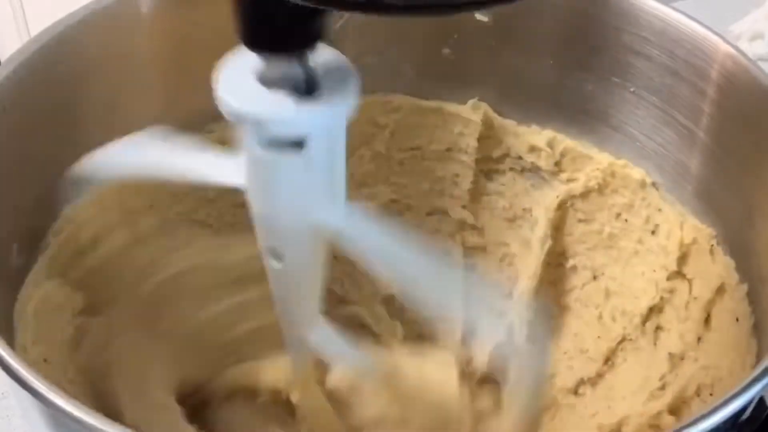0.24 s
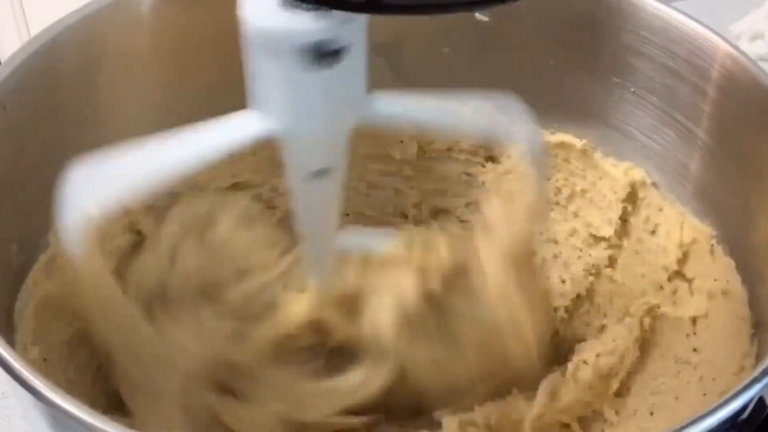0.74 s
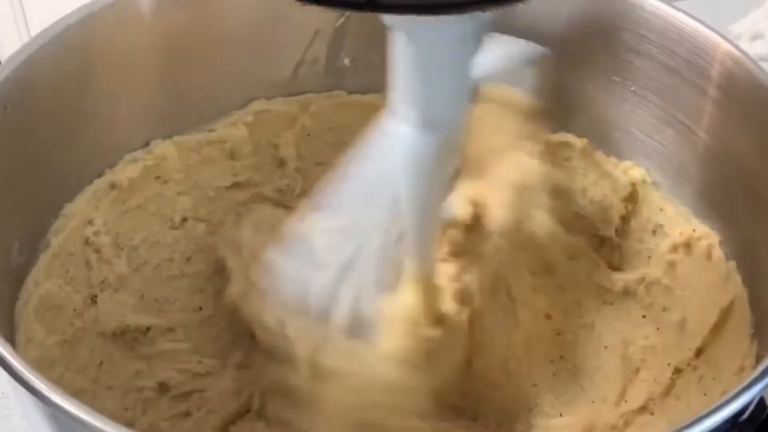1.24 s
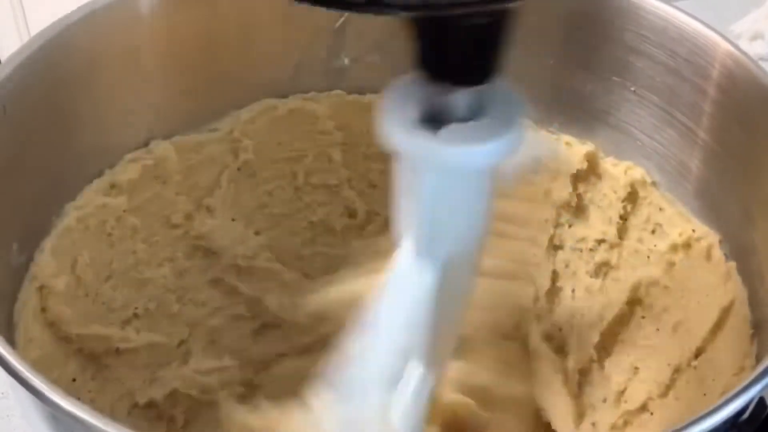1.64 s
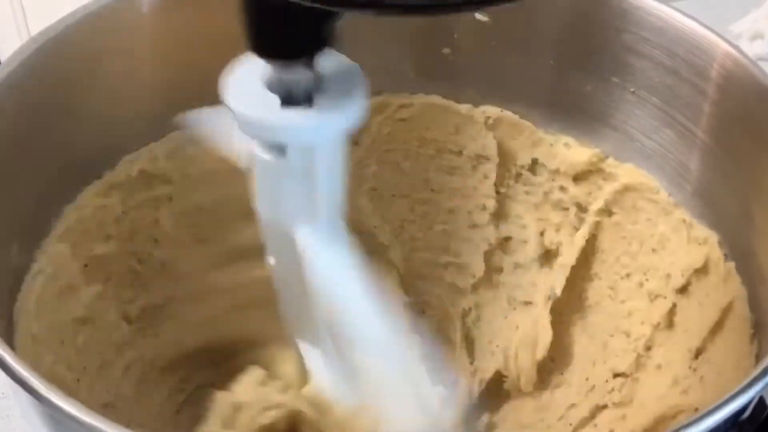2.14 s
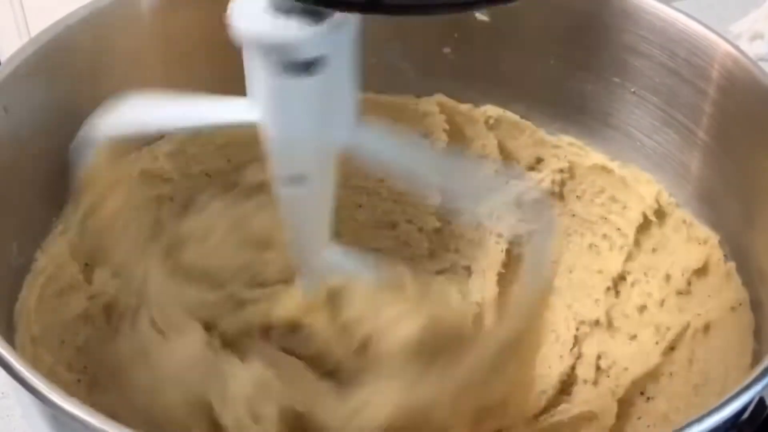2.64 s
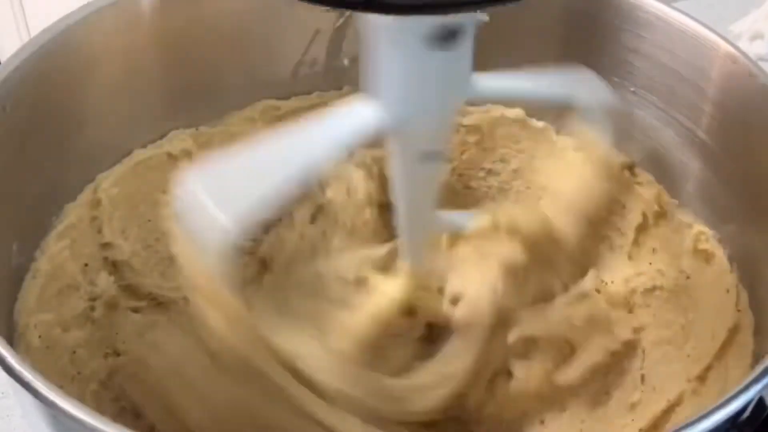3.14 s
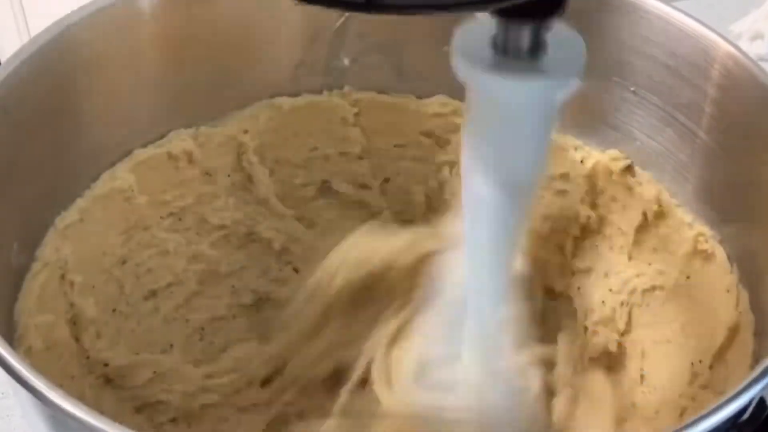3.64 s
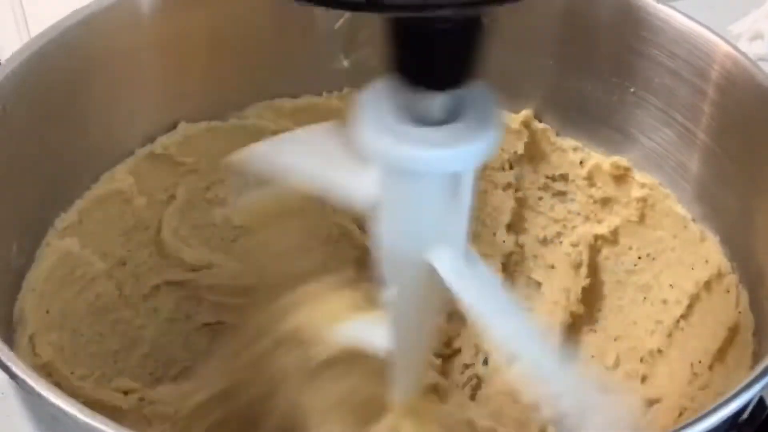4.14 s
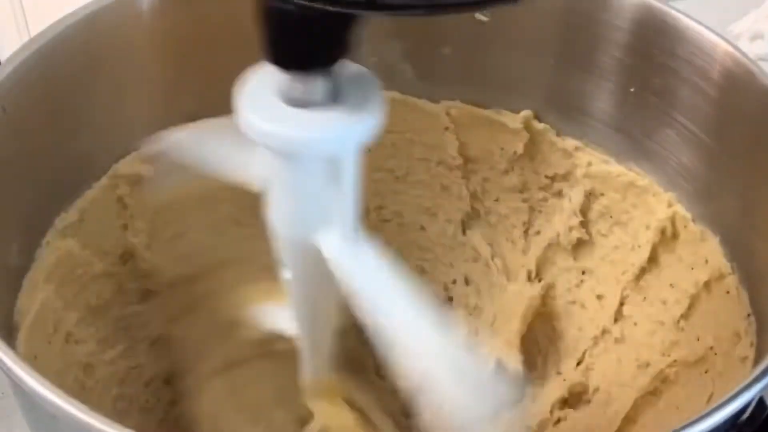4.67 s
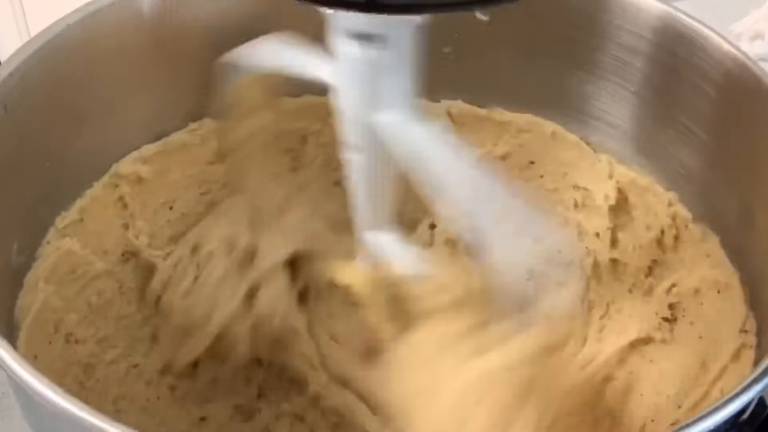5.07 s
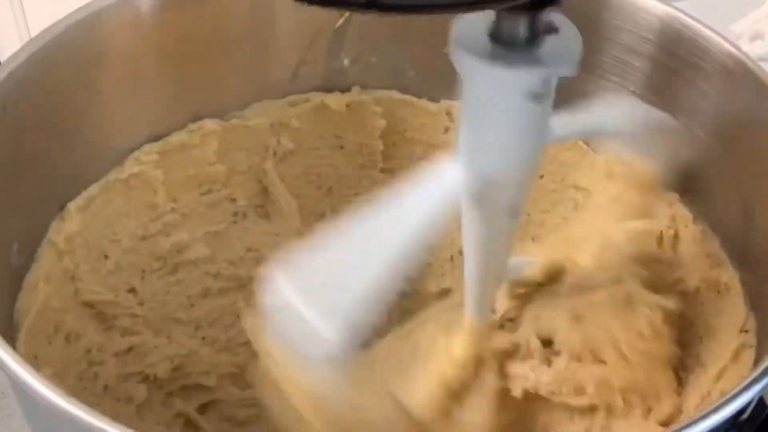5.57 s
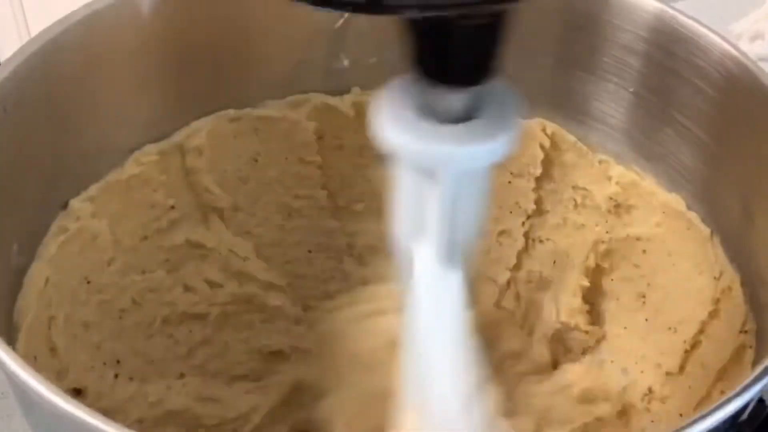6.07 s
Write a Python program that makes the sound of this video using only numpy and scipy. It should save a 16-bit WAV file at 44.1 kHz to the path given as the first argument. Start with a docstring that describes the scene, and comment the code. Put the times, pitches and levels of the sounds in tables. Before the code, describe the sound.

From 0 to about 6.3 seconds a stand mixer works thick dough, already at full steady speed and cut off still running. Very close, dry stereo pickup. The main sound is a strong nasal gear whine around 920 Hz with weaker overtones, its pitch wavering slightly and its loudness throbbing about 10 to 15 times a second, with tiny dropouts giving a gritty warble. Beneath lie rough gear rattle, faint low mains hum and shaft drone; above, thin commutator whistle and broad airy hiss. Short hollow housing knocks fall irregularly, clearer near 0.1, 0.5, 0.7, 1.3 and 1.8 seconds, then at 3.2 and 3.8, strongest around 3.9, 4.4 and 5.0. Quiet, low dough thuds accompany some of them, barely rising from the motor. The whine swells and thins slightly, without any real change of speed.

```python
"""A wavering gear whine leads, close up at two microphone ports: a stand mixer kneading thick dough.
Three mesh sines throb with the gear turns; further sines give shaft, commutator whistle and mains hum.
Noise in resonant bands makes gear rattle and broad gear and commutator overtones, over a broad hiss.
Gear knocks and dough thuds ring damped modes of the housing and bowl."""
import sys
import numpy as np
from scipy import signal
from scipy.fft import rfft, irfft, next_fast_len
from scipy.io import wavfile

SR = 44100
rng = np.random.default_rng(int(sys.argv[2]) if len(sys.argv) > 2 else 0)


def put_to_file(sound):
    """Save the sound as 16-bit audio at rate SR, in the file named by the first command-line argument."""
    columns = np.atleast_2d(sound).T  # one column per channel
    safe = np.clip(columns, -1, 1)
    whole_steps = np.round(safe * 32767)
    wavfile.write(sys.argv[1], SR, whole_steps.astype(np.int16))


N = 277995
TIME = np.arange(N) / SR

# Pitch and level curves of the whine, before the faster swings; partial 3 flickers by chance:
# time_s, pitch_hz, then right-port level_db of partials 1, 2 and 3
WHINE_CURVES = [(0.0, 923, -25, -46.0, -37.0), (0.03, 924, -18.5, -26, -39), (0.06, 921.6, -31, -29.0, -36),
                (0.09, 915, -22, -31.5, -37), (0.12, 918.7, -20.5, -27, -38), (0.15, 922, -26.5, -28, -33),
                (0.18, 909, -20.5, -35.0, -37), (0.21, 914, -21, -37.0, -34),
                (0.24, 910, -28.5, -37, -37.0), (0.27, 906, -19.5, -34, -38.0), (0.3, 907, -16, -34, -37.5),
                (0.33, 914.0, -23, -29, -39), (0.36, 914, -21.5, -33.5, -38),
                (0.39, 921, -17, -32.5, -37.5), (0.42, 934, -16, -32.5, -36), (0.45, 920, -16, -36, -37.5),
                (0.48, 921, -16.5, -29, -37), (0.51, 920.4, -23.5, -32, -37.5),
                (0.54, 923.3, -21.5, -38, -34), (0.57, 927.5, -23.5, -27, -41), (0.6, 928, -26, -34, -34),
                (0.63, 930.2, -23, -34, -36.5), (0.66, 928.6, -24.5, -26, -35.0),
                (0.69, 925.8, -25, -33, -36.5), (0.72, 924.8, -19, -25, -36), (0.75, 923, -20, -31, -40),
                (0.78, 924.0, -39, -37.0, -38.0), (0.81, 926, -22.5, -30, -36),
                (0.84, 931, -14, -32.0, -45), (0.87, 930.3, -18.5, -35.5, -38.5),
                (0.9, 929.8, -18.5, -34.0, -33), (0.93, 928, -15, -31, -37.5),
                (0.96, 927.1, -18.5, -25, -36.5), (0.99, 925, -17, -26, -40), (1.02, 915, -22, -35, -37.0),
                (1.05, 921, -18.5, -32, -34), (1.08, 927, -16.5, -33.5, -36.0),
                (1.11, 927, -19, -32.0, -34), (1.14, 926.5, -17.5, -30.0, -38.5),
                (1.17, 927.3, -23.5, -33.0, -36), (1.2, 925.5, -24.5, -35.0, -38.5),
                (1.23, 922, -23, -35.5, -39), (1.26, 915, -29, -32, -37), (1.29, 912, -29, -29, -36.5),
                (1.32, 911, -27.0, -32.5, -31), (1.35, 920, -22.5, -34, -36), (1.38, 919, -22, -29, -35),
                (1.41, 917, -21, -36.0, -37.5), (1.44, 930, -19.5, -36.0, -37.5),
                (1.47, 924.6, -21, -37, -37), (1.5, 926, -18.5, -32.0, -32), (1.53, 932, -19.5, -30, -40.0),
                (1.56, 933, -19.5, -39, -42), (1.59, 924, -13.5, -30, -35),
                (1.62, 923, -15.5, -31.0, -36.0), (1.65, 915, -21, -32.5, -36),
                (1.68, 920.7, -17, -32, -37), (1.71, 922.5, -18, -35.0, -35.0),
                (1.74, 924, -22.5, -35.5, -35.0), (1.77, 915, -19, -33.5, -37.0),
                (1.8, 915.5, -17.5, -33.0, -39.0), (1.83, 912, -31, -34.0, -39.5),
                (1.86, 911.7, -24.5, -39, -37), (1.89, 913.4, -26, -37, -33),
                (1.92, 921.5, -20, -27.5, -36), (1.95, 919.1, -28, -30, -39),
                (1.98, 927, -26.0, -32.0, -38.0), (2.01, 931, -23, -30, -40.0),
                (2.04, 937, -16.5, -29, -37), (2.07, 933.7, -15, -31, -37), (2.1, 932, -17.5, -33.5, -36),
                (2.13, 921.5, -17.5, -35.0, -35), (2.16, 918, -18, -34.5, -32),
                (2.19, 912, -15.5, -32, -40), (2.22, 925, -21.5, -35.5, -36), (2.25, 925, -19, -31, -39),
                (2.28, 930, -16, -28, -37), (2.31, 932, -16.5, -32.5, -38.0), (2.34, 925.5, -17, -41, -41),
                (2.37, 921, -16.5, -38.0, -37.5), (2.4, 922.3, -20, -39, -37.0),
                (2.43, 922.2, -18, -32.5, -35), (2.46, 921, -20, -33.0, -40), (2.49, 923, -26, -31.5, -35),
                (2.52, 925.7, -23.5, -32.5, -37), (2.55, 926, -29, -36, -34),
                (2.58, 928.5, -25.0, -33, -38.5), (2.61, 932, -23.0, -30, -34),
                (2.64, 930.5, -20, -28, -37.5), (2.67, 929, -19, -33.5, -36), (2.7, 925, -15, -34.0, -37),
                (2.73, 923, -23, -29, -33), (2.76, 923.5, -23, -36.0, -37.0), (2.79, 930, -20.0, -40, -40),
                (2.82, 929, -15.5, -32.0, -36), (2.85, 928.5, -17.5, -34, -37.5),
                (2.88, 923, -15.5, -27, -37.5), (2.91, 923, -14.5, -29, -38.0),
                (2.94, 930, -20.5, -33.0, -37.5), (2.97, 922.7, -14, -36, -36),
                (3.0, 922, -24, -36.5, -36.5), (3.03, 917.2, -17.5, -30, -36.0),
                (3.06, 917.2, -23.5, -34.5, -39), (3.09, 922, -20, -32, -43),
                (3.12, 916, -20.5, -33, -38.0), (3.15, 919, -27.0, -30, -31), (3.18, 919, -33, -33, -37),
                (3.21, 921.6, -25, -31.5, -36.0), (3.24, 923.5, -20, -28.0, -36.5),
                (3.27, 923, -21, -28.0, -36), (3.3, 920, -24, -33.5, -38), (3.33, 918.5, -25, -35.5, -36.5),
                (3.36, 919, -19.5, -35.0, -38), (3.39, 923, -21.5, -37.0, -38),
                (3.42, 930, -20.5, -34, -37), (3.45, 934, -16.5, -32, -37.5), (3.48, 927.1, -16, -25, -34),
                (3.51, 928, -19, -26, -34), (3.54, 921, -18.5, -31, -37), (3.57, 911, -16.5, -43, -39),
                (3.6, 920.5, -22.5, -40, -37.0), (3.63, 926, -18.5, -36, -34), (3.66, 924.7, -21, -36, -35),
                (3.69, 924.4, -23.5, -25, -36.0), (3.72, 923, -32, -32.5, -32),
                (3.75, 921.3, -26, -38, -40), (3.78, 918.1, -27.5, -35, -35),
                (3.81, 914.1, -22.5, -36, -37.0), (3.84, 911.2, -32, -34.0, -38.0),
                (3.87, 909, -27, -33.5, -33), (3.9, 914.5, -21, -34.5, -39), (3.93, 918.5, -23, -31, -37),
                (3.96, 922.4, -20, -36.5, -39.5), (3.99, 925, -20.5, -35.0, -36),
                (4.02, 924.0, -20, -33.0, -34.5), (4.05, 924, -24, -36.0, -35),
                (4.08, 928, -24.5, -31.5, -38.0), (4.11, 929.5, -18, -36, -38.0),
                (4.14, 928.2, -17, -24, -35.5), (4.17, 929, -17.0, -25, -36), (4.2, 927, -17, -33, -38),
                (4.23, 924, -19, -39, -33), (4.26, 925, -25, -37.0, -36.0),
                (4.29, 930, -21.5, -39.0, -32.5), (4.32, 929.0, -17, -34.0, -41),
                (4.35, 927.2, -24.5, -28, -38.5), (4.38, 923, -18, -32.5, -36), (4.41, 920, -31, -31, -40),
                (4.44, 925.4, -22.5, -27, -39), (4.47, 925, -24.0, -32, -37), (4.5, 927, -25, -27.0, -34),
                (4.53, 923, -26.5, -28, -33), (4.56, 926.7, -20.5, -28.5, -40), (4.59, 928, -18, -29, -40),
                (4.62, 928, -20, -31, -41), (4.65, 933, -22, -37, -37.0), (4.68, 928.9, -19.0, -33, -38),
                (4.71, 924, -16, -28.5, -33), (4.74, 927.5, -22, -29, -41), (4.77, 921, -19, -28, -44),
                (4.8, 917, -18, -30, -41), (4.83, 921, -25, -32.5, -39), (4.86, 914.7, -20, -38, -39),
                (4.89, 917, -19.5, -37.0, -37.0), (4.92, 921, -23.5, -38, -40),
                (4.95, 919.5, -22.5, -33, -42), (4.98, 918, -21.5, -29, -40),
                (5.01, 914, -29, -30.5, -36.0), (5.04, 919, -33, -31.0, -36), (5.07, 918, -23, -34.5, -36),
                (5.1, 929.6, -29, -31, -38), (5.13, 934, -24, -25, -35.5), (5.16, 932, -18, -28.5, -33),
                (5.19, 930.4, -21, -27, -40), (5.22, 918, -19, -33, -37), (5.25, 918.5, -24.5, -36, -36.0),
                (5.28, 920.2, -26, -34.5, -37), (5.31, 927.6, -27, -39, -37.0),
                (5.34, 925.5, -16.5, -30, -35), (5.37, 923, -20.5, -25, -41), (5.4, 923, -19.5, -29, -39.5),
                (5.43, 926.2, -20, -28, -40), (5.46, 927.6, -21.5, -28, -43),
                (5.49, 925.7, -17.5, -32.0, -41), (5.52, 922.1, -17, -41, -39),
                (5.55, 919.4, -20.5, -37.5, -39), (5.58, 919.1, -26, -30, -36.0),
                (5.61, 922, -24.5, -32.5, -37), (5.64, 924, -26.5, -28, -38.5),
                (5.67, 921.3, -31, -28, -38.5), (5.7, 921.6, -26, -25, -37.5), (5.73, 922, -28, -33, -39),
                (5.76, 927, -33, -29.5, -36), (5.79, 927, -20, -27.5, -43), (5.82, 927, -25, -27, -37),
                (5.85, 918.4, -29, -36.5, -38), (5.88, 918.5, -24, -35, -38), (5.91, 913.4, -22, -34, -38),
                (5.94, 925.4, -28, -35.5, -34), (5.97, 934, -20, -31, -36), (6.0, 936, -18.5, -31, -41),
                (6.03, 941, -14, -28, -36.5), (6.06, 927, -18, -26, -36.5), (6.09, 914, -18.5, -38.5, -36),
                (6.12, 916.5, -22, -37.5, -37.0), (6.15, 923.0, -24, -41, -35.5),
                (6.18, 927.1, -18.5, -31, -35.5), (6.21, 926.7, -36, -30.5, -37.5),
                (6.24, 926, -25, -32, -36.5), (6.27, 918, -23, -31, -33), (6.3, 922, -42, -35.0, -39.5)]
# Level throb of the mesh with the turns of the gears, before each partial's depth factor:
# rate_hz, then swing_db and first_crest_s for partials 1, 2 and 3
MESH_THROB = [(10.64, 2.27, 0.0559, 2.38, 0.0583, 1.41, 0.0645),
              (15.36, 1.15, 0.0523, 3.35, 0.0503, 0.88, 0.0349),
              (21.28, 0.59, 0.0202, 0.38, 0.0186, 0.09, 0.0114),
              (30.72, 0.91, 0.0045, 1.78, 0.0041, 2.01, 0.0108),
              (61.44, 0.07, 0.0135, 0.45, 0.0016, 1.1, 0.0034)]
# Hunting of the motor speed: rate_hz, swing (share of pitch), first_crest_s
SPEED_HUNT = (10.64, .008, .043)
# Tooth spacing error of the driven gear, before each partial's share: rate_hz, swing (share of pitch), first_crest_s
TOOTH_SPACING = [(15.36, .007, .003), (30.72, .01, .0115)]
# Mesh partials at the ports: tooth_error_share, throb_depth (factor), left_minus_right_db, left_lead_rad,
# flutter_db, wander_rad
MESH_PARTIALS = [(0.42, 1.0, -5.5, -1.29, 0.6, 0.2), (0.5, 1.15, -4.5, -2.06, 0.8, 0.3),
                 (1.1, 1.2, -2.5, 1.4, 0.6, 0.2)]
# Short dips of the whine as the teeth part, in full on partial 1 only: centre_s, depth_db
TOOTH_PARTINGS = [(0.087, -12), (0.408, -10), (0.469, -8), (1.062, -10), (1.125, -11), (1.222, -10),
                  (1.256, -8), (1.292, -11), (1.323, -6), (1.42, -11), (1.59, -6), (1.644, -4), (1.681, -5),
                  (1.712, -6), (1.885, -12), (1.975, -9), (2.172, -9), (2.738, -9), (2.904, -11),
                  (3.012, -7), (3.081, -12), (3.282, -5), (3.309, -9), (3.399, -15), (3.475, -7),
                  (3.546, -12), (3.668, -6), (3.763, -12), (3.826, -12), (3.936, -19), (4.054, -12),
                  (4.226, -20), (4.251, -8), (4.426, -5), (4.782, -7.5), (5.081, -10), (5.298, -8),
                  (5.551, -11), (5.639, -9), (5.942, -16), (6.111, -8), (6.14, -3)]
PARTING_SPREAD_S = 0.0036
# Shaft, commutator and twice the commutator: multiple of the motor speed (given as mesh pitch)
SHAFT_AND_COMMUTATOR = (.0996, 2.381, 4.762)
# The same three tones: throb_db at the hunting rate, right_level_db, left_minus_right_db, left_lead_rad,
# flutter_db, wander_rad
MOTOR_TONES = [(-2, -50, 0.7, -0.4, 2, 0.2), (1.5, -51.5, -1, -0.7, 3, 0.4),
               (0.8, -41.5, -0.5, -2.6, 3.5, 0.3)]
MOTOR_THROB_CREST_S = 0.0936
# Winding hum, multiples 1 to 5 of the ripple: right_level_db, left_minus_right_db, left_lead_rad, flutter_db
HUM_TONES = [(-58.5, 1, -0.4, 3), (-52.5, -2, -1, 5), (-56, 1, -1, 2), (-39, 8, 0.02, 1.3), (-51, 0, -3, 3)]
RIPPLE_HZ = 119.97  # twice the mains frequency
# Noise bands, body resonances and broad gear and commutator overtones:
# centre_hz, width_hz (between the -6 dB points), top_db_per_hz, left_minus_right_db
NOISE_BANDS = [(98, 37, -63.5, 0), (223, 50, -63.5, -1.5), (462.7, 64.6, -55.5, -5), (758, 35, -54.5, -4.5),
               (807, 58, -49.5, -6), (915, 50, -58, 2), (1040, 58, -54, -1), (1239, 60, -63.5, -8),
               (1575, 58, -60, -1), (1848, 146, -63, -1.5), (2070, 56, -65.5, -10), (2772, 132, -64, 1),
               (3410, 140, -73.5, -2), (3995, 65, -67, -2.5), (4200, 120, -71, -2), (4360, 250, -72, -2),
               (5430, 230, -71.5, 3), (5960, 60, -73, 0), (6385, 63, -71, -0.5), (6550, 104, -65.5, 0),
               (6920, 55, -65, -4), (7244, 310, -68, 0.5), (8270, 120, -68, 0), (8550, 200, -67, 0),
               (8790, 260, -63.5, 0), (9165, 60, -69, 0), (10500, 240, -69, 0)]
# Throb of the noise bands, weaker in the high ones: rate_hz, swing_db, first_crest_s
BAND_THROB = [(1.58, 0.13, 0.81), (10.64, 1.5, 0.0058), (15.36, 3, 0.067)]
BAND_EXTRA_LIKENESS = 0.084  # added to the 0-1 likeness of the ports
# Spectrum of the broad hiss, with a narrow dip and bump near its top: frequency_hz, level_db_per_hz
HISS_SPECTRUM = [(20, -111), (55, -67.5), (150, -69), (380, -70.5), (650, -67), (1200, -68.5),
                 (2400, -69.5), (3100, -75.5), (4800, -70), (5850, -74), (6250, -72), (7700, -76.5),
                 (8100, -73), (9300, -69.5), (10300, -70.5), (11800, -71.5), (13000, -78.5), (14300, -80),
                 (14550, -86), (15000, -80), (15300, -96)]
# Tilt of the hiss between the ports: frequency_hz, left_minus_right_db
HISS_PORT_BALANCE = [(60, -1.5), (200, 2.5), (380, -0.5), (700, -1.5), (1290, -1), (2380, -1.5),
                     (4400, -1.4), (7000, 0)]
# Edges of the hiss bands that flicker separately: edge_hz
FLICKER_EDGES_HZ = [0, 150, 400, 1200, 2400, 3600, 5000, 7000, 9500, 12500, 23000]
# How alike the noise is at the two ports below the treble: frequency_hz, likeness (0-1)
PORT_LIKENESS = [(60, 1), (300, 0.86), (600, 0.5), (1500, 0.36), (3200, 0.38), (6000, 0.6), (7300, 0.54)]
# Phase of the shared noise below the treble: frequency_hz, left_lead_rad
PORT_LEAD = [(0, 0.36), (950, -1.1), (1550, 0.07), (1810, 5.5), (2840, 0.8), (4130, -2.5), (4480, -1),
             (5510, -5), (6800, -4.5)]
# Stereo phase of the treble noise, opposite at 8-10 kHz, equal above 12.5 kHz:
# frequency_hz, likeness (0-1), left_lead (half turns)
TREBLE_PHASE = [(7700, .85, -1), (8250, 1, -1), (9700, 1, -1), (10300, .6, -.9), (11200, .5, -.6),
                (12300, .6, -.15), (12500, 1, 0), (16000, 1, 0)]
# Slack gears knocking as the beater bites, before the mode levels: start_s, peak_db
GEAR_KNOCKS = [(0.0958, -16), (0.3217, -27), (0.460, -20), (0.6636, -17), (1.002, -22), (1.222, -28),
               (1.3188, -19), (1.4223, -30), (1.672, -23), (1.779, -14), (1.981, -21), (2.329, -31),
               (2.5401, -21), (2.7554, -21), (2.902, -24), (3.2033, -18), (3.762, -16), (3.8637, -11.5),
               (3.952, -17), (4.207, -25), (4.4206, -12.5), (4.8707, -16), (4.979, -12), (5.072, -17),
               (5.182, -18), (5.3085, -22), (5.422, -22), (5.782, -21), (6.0805, -26), (6.237, -21)]
# Housing modes rung by a knock: pitch_hz, level_db before random spread, decay_t60_s, left_minus_right_db
HOUSING_MODES = [(447, -10, 0.09, -9.5), (800, -8, 0.035, -6), (1040, -10, 0.05, -2),
                 (1120, -12.5, 0.02, 0), (1250, -18, 0.025, 2)]
KNOCK_SWELL_T60_S = 0.017
# Dough thumping against the bowl, before the mode levels: start_s, peak_db
DOUGH_THUDS = [(0.135, -40), (0.415, -36), (0.672, -33), (0.845, -43), (1.242, -31), (1.354, -35),
               (1.782, -40), (2.156, -34), (2.561, -32.5), (2.638, -34), (2.795, -37), (3.769, -37),
               (3.876, -33), (4.222, -38), (4.423, -35), (4.763, -35), (5.094, -32), (5.195, -41),
               (5.319, -37), (5.759, -36), (5.985, -41)]
# Bowl modes rung by a thud: pitch_hz, level_db, decay_t60_s, swell_t60_s
THUD_MODES = [(110, -6, .2, .1), (212, .5, .15, .04), (430, -6, .12, .03)]
CUTOFF_HZ = 15675


def from_db(db):
    """Gain of a level in dB."""
    return 10 ** (np.asarray(db) / 20)


def at_hz(points, hz):
    """Read a spectrum table on a nearly logarithmic frequency axis."""
    points = np.array(points)
    return np.interp(np.log(hz + 20), np.log(points[:, 0] + 20), points[:, 1])


def drift(rate_hz):
    """Slow chance motion of spread about 1: noise through two equal one-pole low-passes."""
    pole = np.exp(-40 * np.pi * rate_hz / SR)  # runs at a twentieth of the sample rate
    noise = rng.standard_normal(N // 20 + 4002)
    slow = signal.lfilter([1], [1, -2 * pole, pole * pole], noise)[4000:]  # skip the settling
    return np.interp(np.arange(N) / 20, np.arange(len(slow)), slow / slow.std())


def swing(rows):
    """Sum of cosines from rows of rate_hz, size, first_crest_s."""
    return sum(size * np.cos(2 * np.pi * rate_hz * (TIME - crest_s)) for rate_hz, size, crest_s in rows)


def tone(hz, level_db, balance_db, lead_rad, flutter_db, wander_rad=0.12):
    """A sine at both ports, level_db its rms before flutter; reflections make each port's phase wander."""
    phase = 2 * np.pi * np.cumsum(hz * np.ones(N)) / SR + rng.uniform(0, 2 * np.pi)
    gain = np.sqrt(2) * from_db(level_db + flutter_db * drift(35.0))
    left_gain = from_db(balance_db + 0.23 * flutter_db * drift(21))
    left = left_gain * np.sin(phase + lead_rad + wander_rad * drift(16.0))
    right = np.sin(phase + wander_rad * drift(13.5))
    return gain * np.array([left, right])


def motor_speed():
    """Motor speed as mesh pitch in Hz: it follows the pitch curve, hunts and drifts slightly."""
    time_s, pitch_hz = np.transpose(WHINE_CURVES)[:2]
    return np.interp(TIME, time_s, pitch_hz) * (1 + swing([SPEED_HUNT]) + 0.000808 * drift(12.04))


def parting_dips_db():
    """Gaussian level dips of the mesh whine while the teeth carry no load."""
    return sum(depth_db * np.exp(-.5 * ((TIME - centre_s) / PARTING_SPREAD_S) ** 2)
               for centre_s, depth_db in TOOTH_PARTINGS)


def mesh_whine(speed_hz):
    """Meshing teeth sing on three partials; spacing error bends their pitch and gear turns throb their level."""
    time_s, _, *levels_db = np.transpose(WHINE_CURVES)
    dips_db = parting_dips_db()
    whine = 0
    for k, (error_share, throb_depth, *ports) in enumerate(MESH_PARTIALS):
        tooth_hz = speed_hz * (1 + error_share * swing(TOOTH_SPACING))
        throb_rows = [(row[0], row[1 + 2 * k], row[2 + 2 * k]) for row in MESH_THROB]
        level_db = np.interp(TIME, time_s, levels_db[k]) + throb_depth * swing(throb_rows)
        level_db = level_db + dips_db / (k + 1)  # upper partials dip less
        whine = whine + tone((k + 1) * tooth_hz, level_db, *ports)
    return whine


def motor_tones(speed_hz):
    """Shaft and commutator sound at fixed multiples of the motor speed and throb at its hunting rate."""
    hunting = swing([(SPEED_HUNT[0], 1, MOTOR_THROB_CREST_S)])
    tones = 0
    for multiple, (throb_db, level_db, *ports) in zip(SHAFT_AND_COMMUTATOR, MOTOR_TONES):
        tones = tones + tone(multiple * speed_hz, level_db + throb_db * hunting, *ports)
    return tones


def hum():
    """The windings hum at multiples of twice the mains frequency, steady in pitch."""
    return sum(tone((k + 1) * RIPPLE_HZ, *row) for k, row in enumerate(HUM_TONES))


def likeness(hz):
    """Likeness of the noise at the two ports over the whole range."""
    return at_hz(PORT_LIKENESS + [(f, alike) for f, alike, _ in TREBLE_PHASE], hz)


def port_noise(power, balance_db, alike, hz):
    """Stereo noise of a given power per Hz: the left mixes the right's noise, phase shifted, with its own."""
    shared, own = rfft(rng.standard_normal((2, 2 * len(hz) - 2))) * np.sqrt(power * SR / 2)
    alike = np.clip(alike, 0, 1)
    lead_rad = at_hz(PORT_LEAD + [(f, np.pi * half_turns) for f, _, half_turns in TREBLE_PHASE], hz)
    left = alike * np.exp(1j * lead_rad) * shared + np.sqrt(1 - alike ** 2) * own
    return irfft(np.array([from_db(balance_db) * left, shared]))[:, :N]


def rattle_and_overtones(hz):
    """Noise in resonance-shaped bands throbs together at the gear rates, and each band flickers on its own."""
    throb_db = swing(BAND_THROB)
    alike = likeness(hz) + BAND_EXTRA_LIKENESS
    bands = 0
    for centre_hz, width_hz, top_db, balance_db in NOISE_BANDS:
        power = from_db(2 * top_db) / (1 + (2 * (hz - centre_hz) / width_hz) ** 2) ** 2
        share = np.clip(1500 / centre_hz, 0, 1)  # high bands throb less
        level_db = share * throb_db + (1.0 + 0.36 * share) * drift(5.0)
        bands = bands + from_db(level_db) * port_noise(power, balance_db, alike, hz)
    return bands


def hiss(hz):
    """Broad noise pulses faintly with the motor shaft, its hunting and a slow swing; each band also flickers."""
    power = from_db(2 * at_hz(HISS_SPECTRUM, hz))
    balance_db, alike = at_hz(HISS_PORT_BALANCE, hz), likeness(hz)
    pulse_db = swing([(92.2, .5, .002), (10.64, .2, .019), (3.18, .2, .05)]) + .25 * drift(4)
    noise = 0
    for low_hz, high_hz in zip(FLICKER_EDGES_HZ, FLICKER_EDGES_HZ[1:]):
        in_band = (hz >= low_hz) & (hz < high_hz)
        band = port_noise(power * in_band, balance_db, alike, hz)
        noise = noise + from_db(pulse_db + .6 * drift(8) + 1.1 * drift(30)) * band
    return noise


def ring(drive, hz, t60_s):
    """A two-pole resonator: a unit click sets a decaying sine of starting height 1 ringing."""
    radius, angle = from_db(-60 / (t60_s * SR)), 2 * np.pi * hz / SR
    # the tiny offset keeps the decay clear of slow, vanishing numbers
    return signal.lfilter([0, np.sin(angle)], [1, -2 * radius * np.cos(angle), radius * radius], drive + 1e-18)


def strike(events, hz, level_db, t60_s, swell_t60_s):
    """A soft contact swells: a short resonance on the mode's own pitch drives it; peak is event plus mode level."""
    start_s, peak_db = np.transpose(events)
    clicks, one_click = np.zeros(N), np.eye(1, SR // 4)[0]
    clicks[(start_s * SR).astype(int)] = from_db(peak_db + level_db)
    peak = np.abs(ring(ring(one_click, hz, swell_t60_s), hz, t60_s)).max()
    return ring(ring(clicks, hz, swell_t60_s), hz, t60_s) / peak


def knocks():
    """Slack in the gears strikes the housing modes, each knock with mode strengths of its own."""
    spread_db = 2.8 * rng.standard_normal((len(GEAR_KNOCKS), len(HOUSING_MODES)))
    out = 0
    for k, (hz, level_db, t60_s, balance_db) in enumerate(HOUSING_MODES):
        right = strike(GEAR_KNOCKS, hz, level_db + spread_db[:, k], t60_s, KNOCK_SWELL_T60_S)
        left = from_db(balance_db) * np.roll(right, shift=14)  # samples: the left port is farther
        out = out + np.array([left, right])
    return out


def thuds():
    """Dough thumps ring the low bowl modes, alike at both ports."""
    return sum(strike(DOUGH_THUDS, *mode) for mode in THUD_MODES)


def scene():
    """All layers at the two ports."""
    size = 2 * next_fast_len(N // 2 + 1)
    hz = np.arange(size // 2 + 1) * SR / size
    speed_hz = motor_speed()
    tones = mesh_whine(speed_hz) + motor_tones(speed_hz) + hum()
    return tones + rattle_and_overtones(hz) + hiss(hz) + knocks() + thuds()


def record(dry):
    """A steep elliptic low-pass cuts the top."""
    return signal.sosfilt(signal.ellip(12, .5, 70, CUTOFF_HZ, fs=SR, output="sos"), dry)


dry = scene()
out = record(dry)
put_to_file(out)
```